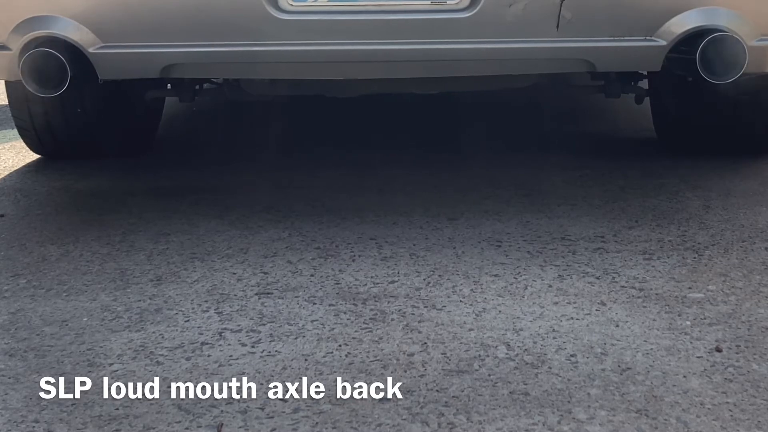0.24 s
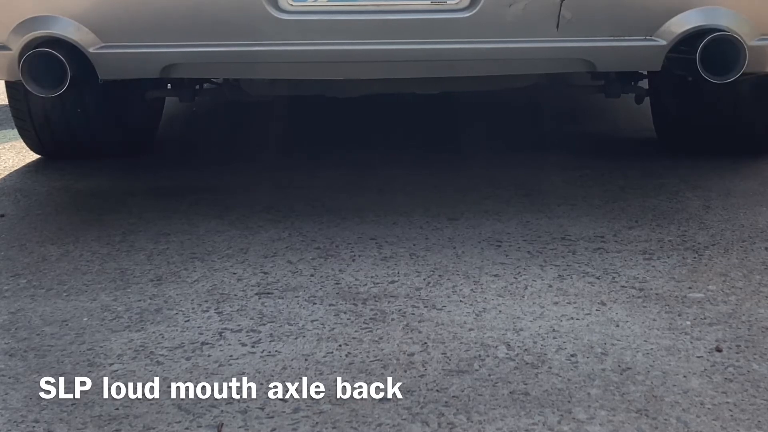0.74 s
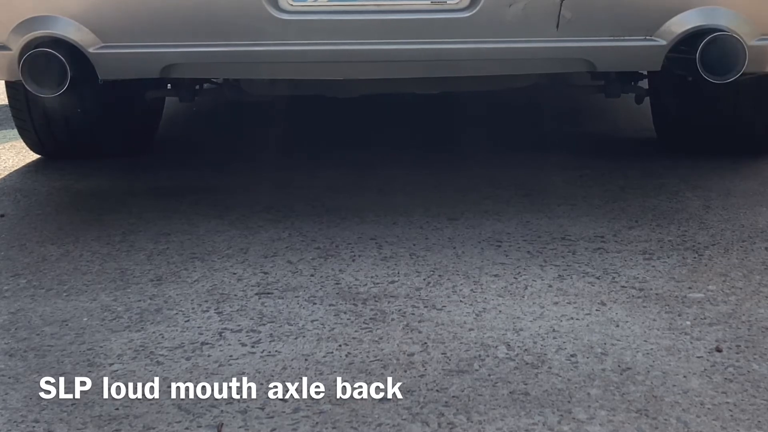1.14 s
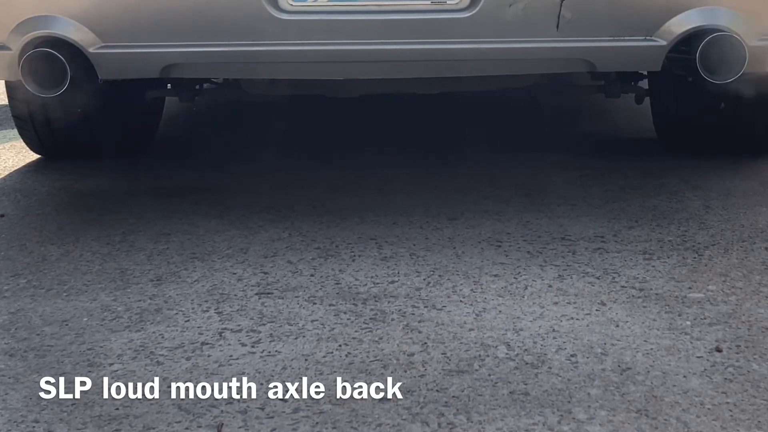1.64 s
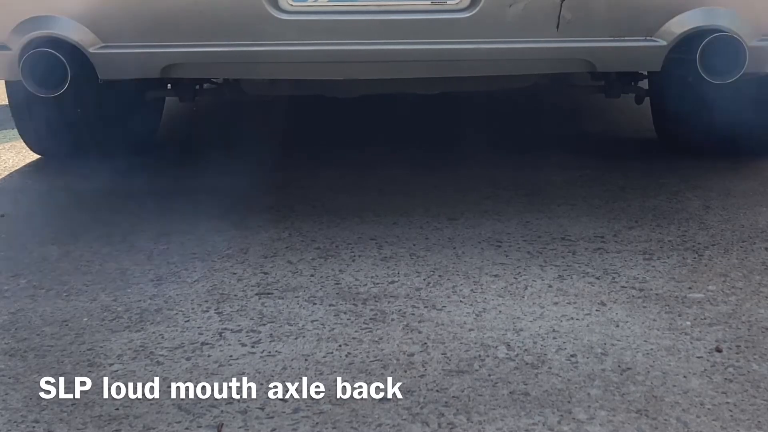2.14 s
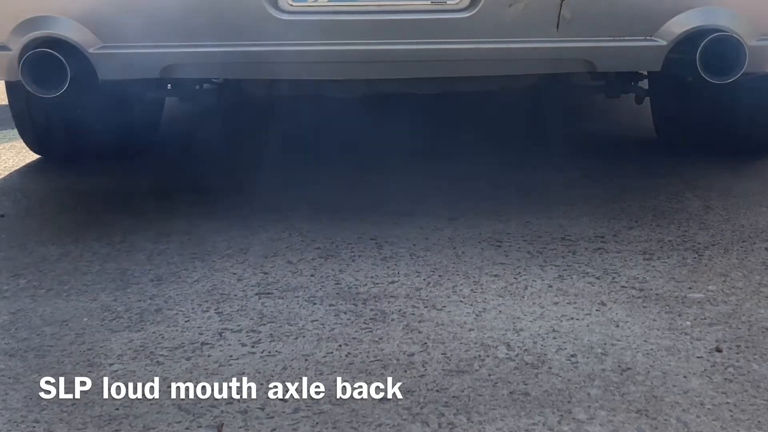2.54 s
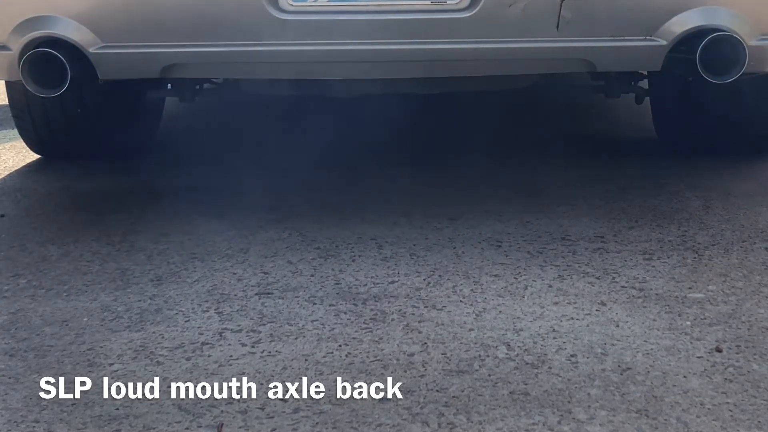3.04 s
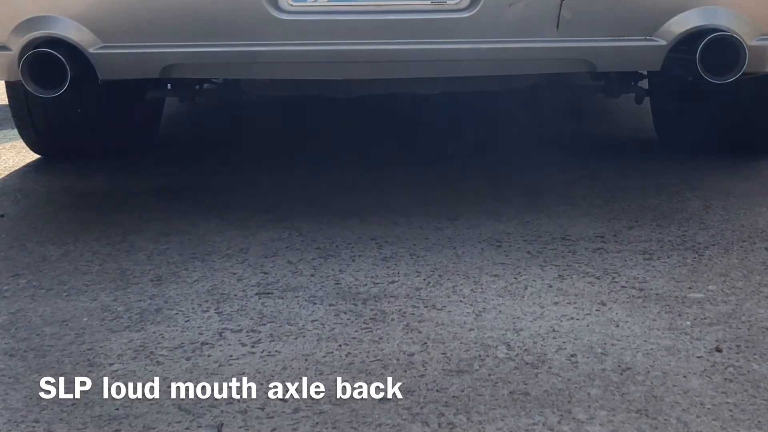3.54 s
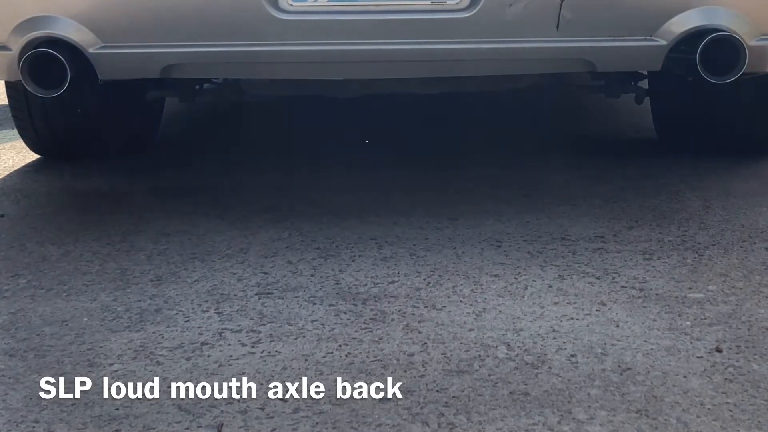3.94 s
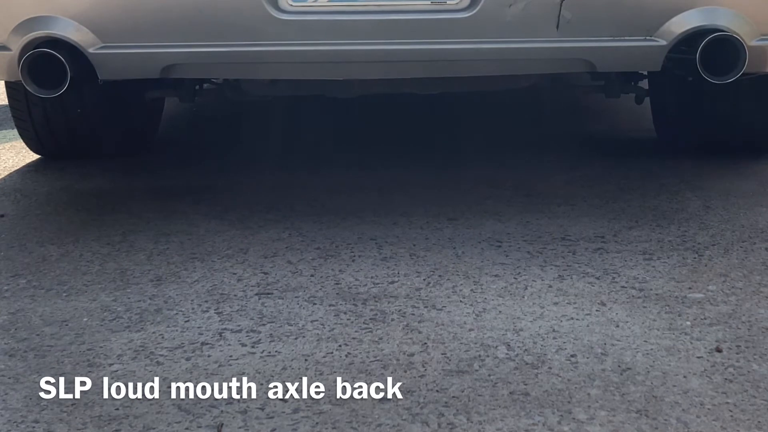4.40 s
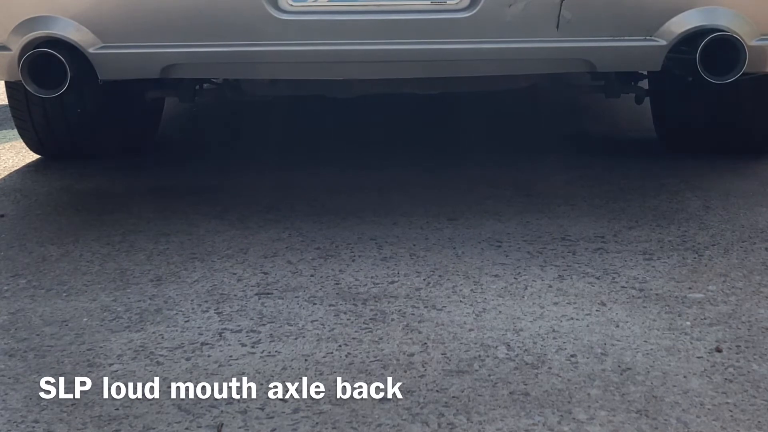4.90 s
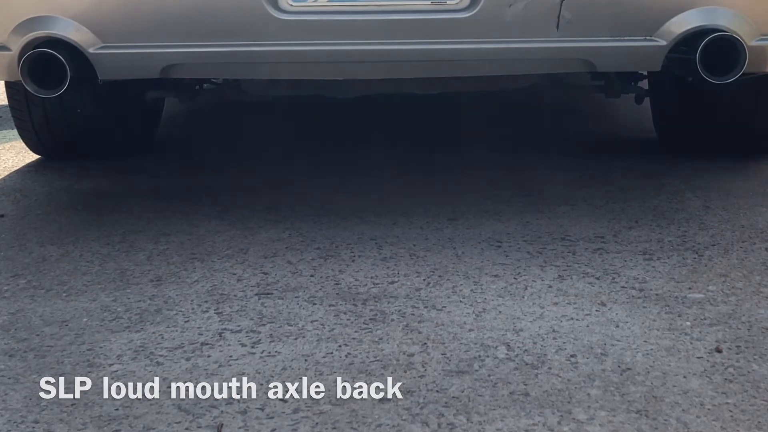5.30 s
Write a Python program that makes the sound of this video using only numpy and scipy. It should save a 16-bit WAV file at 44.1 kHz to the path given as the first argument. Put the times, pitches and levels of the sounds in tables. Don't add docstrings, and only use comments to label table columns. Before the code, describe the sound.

Outdoors, low and close behind a car's twin tailpipes, a throaty eight-cylinder engine is blipped at once, crackling and rasping, then falls with a swelling burble. A second, harder blip screams higher, its throttle snapping shut with a low thump and a volley of pops. The revs slide down to a steady fast idle drone. A close stereo microphone, loud and slightly saturated, with faint hiss and rumble beneath.

```python
import sys
import numpy as np
from scipy import signal
from scipy.fft import rfft, irfft, next_fast_len
from scipy.io import wavfile
from scipy.ndimage import uniform_filter1d

SR = 44100
rng = np.random.default_rng(int(sys.argv[2]) if len(sys.argv) > 2 else 0)


def invert_db(x):
    u = np.asarray(x, float) / 20
    return 10 ** u


def dump(signal):
    limited = np.clip(np.atleast_2d(signal).T, -1, 1)
    pcm = np.round(limited * 32767).astype(np.int16)
    wavfile.write(sys.argv[1], SR, pcm)


N = 245195

# time in seconds, firings per second.
FIRING_RATE = [(0.0, 84.6), (0.15, 115.6), (0.4, 210.9), (0.49, 233.5), (0.76, 212.9), (0.9, 191),
               (1.28, 141.9), (1.58, 116.9), (1.67, 148.8), (2.06, 311), (2.17, 337), (2.39, 323),
               (2.93, 244.1), (3.5, 169.4), (3.99, 128.7), (4.47, 102.1), (4.88, 90.3), (5.56, 88.0)]
# time in seconds, level in dB over a shut throttle.
GAS_LOAD = [(0.0, 13.5), (0.12, 22.5), (0.42, 21), (0.54, 15), (0.63, 10.5), (0.8, 4.8), (1.13, 1.5),
            (1.2, 8), (1.56, 4.5), (1.64, 18.5), (1.8, 20.5), (1.96, 18.5), (2.09, 15.5), (2.23, -0.5),
            (2.42, 7), (2.9, 3), (3.3, 1.5), (5.56, 3.5)]
# firing rate in Hz, rms in dB on a shut throttle.
DRONE_LEVEL = [(88, -20.5), (102, -16), (125, -20), (145, -15), (175, -19), (205, -20), (244, -20.5),
               (300, -22)]
# firing rate in Hz, rms in dB on a shut throttle.
OCTAVE_LEVEL = [(88, -30), (105, -38.5), (122, -29.5), (138, -29.5), (175, -25), (208, -30.5), (250, -26),
                (300, -35)]
CYLINDER_UNEVENNESS = [
    [.95, -.25, -.2, .3, .7, -.75, .35, .1],
    [1.3, -.25, -.05, -.1, .55, -.1, -.05, -.25],
]
# time in seconds, share from 0 to 1.
MISFIRE_SHARE = [(0, .25), (.45, .3), (.55, .2), (1.1, .3), (1.58, .3), (1.7, .3), (2.08, .35), (2.15, .1),
                 (2.4, .1), (2.7, .3), (3.05, .32), (3.2, .45), (3.45, .28), (4.4, .2), (4.75, .08),
                 (5.56, .08)]
# frequency in Hz, width in Hz, level in dB.
PIPE_MODES = [(221, 92, 1.5), (368, 47.6, 0.5), (427.5, 25, 3.5), (490.4, 47.2, 1), (534, 40.5, -3),
              (631.4, 51.7, -4.5), (767, 136, -13), (1102, 190, -22)]
# frequency in Hz, width in Hz, level in dB.
SILENCER_MODES = [(60.4, 14, -30), (151, 24, -2.5)]
CYLINDER_RASP_DB = [-7, 3, -19.5, 2, -10, -4, -2, -2]
# frequency in Hz, width in Hz, level in dB.
MOUTH_MODES = [(1437, 970, -3.5), (1550, 370, 2), (2310, 620, -3.5), (3140, 540, -6.5)]
# frequency in Hz, density in dB per Hz.
JET_SPECTRUM = [(1940, -22), (3300, -10.5), (3930, -3), (5770, -5.5), (6870, -16.5), (8240, -4.5),
                (9880, -10), (11400, -14.5), (13900, -16), (15600, 3.5)]
# frequency in Hz, density in dB per Hz.
FAN_SPECTRUM = [(5000, -30), (7500, -17), (10000, -1), (12500, 11), (15000, 8)]
# frequency in Hz, density in dB per Hz.
RUMBLE_SPECTRUM = [(15, -34), (35, -34), (60, -19), (130, -12), (300, -16), (650, -17), (1100, -40),
                   (3000, -48)]
# frequency in Hz, width in Hz, level in dB.
CASING_MODES = [(4520, 600, -56), (7200, 3000, -61)]
# time in seconds, crack peak in dB, level of the bright top relative to it in dB.
PIPE_POPS = [(0.0823, -10, -15), (0.1516, -3, -22.5), (0.2157, -14, -16), (0.3253, -10, -17),
             (0.368, -4.5, -17.5), (0.5059, -11, -24), (0.5396, -1.5, -34), (0.5744, -8, -33),
             (0.8499, 0, -53), (0.8653, -24, -31), (0.9331, -18, -38), (1.6886, -4.5, -24),
             (1.91, -0.5, -37), (1.9261, -3, -33), (1.9583, -16.5, 4), (1.9717, -6.5, -6.5),
             (1.987, -1.5, -16), (2.0154, 2, -22), (2.0292, -8, -4), (2.0413, -5.5, -7.5), (2.056, -24, 4),
             (2.069, -9, -18), (2.0974, -9, -22), (2.1415, -11.5, -23), (2.188, -18, -28),
             (2.466, -9.5, -35), (2.4795, -15.5, -31), (2.4142, -16.5, -31), (2.5061, -12, -24),
             (2.6262, -24.5, -20)]
# start in seconds, length in seconds, burble gain in dB.
LATE_BURNS = [
    (.803, 0.16, 10),
    (1.002, .095, 8.5),
    (2.394, 0.16, 7.5),
    (2.608, 0.039, 2),
]
# start in seconds, peak in dB, pitch in Hz, 60 dB decay in seconds.
GAS_THUMPS = [
    (2.053, -9.5, 51, .17),
]
# frequency in Hz, left's lead in
PORT_LEAD = [(0, 0), (700, -.1), (1500, -.5), (3300, -2.0), (5700, -2.2), (6500, -5.4), (8000, -7.2),
             (8600, -9.3), (9550, -9.55), (10100, -11.6), (12600, -13.8), (13150, -15.55), (14300, -15.85),
             (14800, -18.5)]
# frequency in Hz, left minus right in dB.
PORT_TILT = [(60, -.3), (200, 0), (500, 0), (1000, .8), (2200, 4), (4400, .5), (8500, 0), (15000, 0)]
# frequency in Hz, level in dB.
PORT_APART = [(30, -18), (120, -28), (300, -26), (700, -11), (1500, -7), (3000, -7), (6800, -9),
              (8500, -30), (15000, -28)]

# (dB on a shut throttle, dB per dB of load)
RASP, JET, BURBLE = (-45, 0.95), (-52.5, 1.324), (-27, 0.71)
DRONE_FOLLOWS, OCTAVE_FOLLOWS = 0.44, 0.4
BURBLE_DB_PER_OCTAVE, BOOM_DB, AFTERBURN_BOOM_DB = 5, 5.8, 11.5
PIPE_CUT_HZ = 1005
RUMBLE_DB = -37
FUEL_CUT_S, FUEL_CUT_DB = (2.13, 2.6), (-6, -3, -3.5)
LIFT_OFF_S, LIFT_OFF_DB = (2.045, 2.16), (-3, -4.5)
AFTERBURN_SAG, AFTERBURN_SHARE, AFTERBURN_DRONE = 0.3, 0.72, -0.57
CRACKLES_PER_S, CRACKLE_DB = (16, 80), (7.5, 13)
CRACKLE_SPREAD_DB, CRACKLE_TOP_DB = 5, -18


def rms_one(x):
    return x / np.sqrt(np.mean(x ** 2) + 1e-20)


def evened(x, window_s):
    return x / np.sqrt(uniform_filter1d(x ** 2, size=int(window_s * SR)) + 1e-12)


def at_hz(points, hz):
    at, value = np.transpose(points)
    return np.interp(np.log(hz + 1), np.log(at + 1), value)


def in_time(rows):
    return np.interp(np.arange(N) / SR, *np.transpose(rows))


def between(start_s, end_s, edge_s=0.0054):
    t = np.arange(N) / SR
    return np.clip(np.minimum(t - start_s, end_s - t) / edge_s, 0, 1)


def shaped(x, gain):
    size = next_fast_len(N + 4096)
    hz = np.arange(size // 2 + 1) * SR / size
    return irfft(rfft(x, size) * gain(hz), size)[..., :N]


def noise(white, spectrum):
    return rms_one(shaped(white, lambda hz: invert_db(at_hz(spectrum, hz))))


def resonate(x, modes):
    out = 0
    for k, (hz, width_hz, db) in enumerate(modes):
        r = np.exp(-np.pi * width_hz / SR)
        poles = [1, -2 * r * np.cos(2 * np.pi * hz / SR), r * r]
        mode = signal.lfilter([1 - r * r, 0, r * r - 1], poles, x + 1e-18)
        out = out + (-1) ** k * invert_db(db) * mode
    return out


def travelled(slugs):
    return shaped(slugs, lambda hz: np.exp(-5.5j * np.log(1 + hz / 150)))


def train(at, sizes):
    clicks = np.zeros(N)
    clicks[at] = sizes
    return clicks


def puffs(clicks, decay_s):
    envelope = signal.lfilter([1], [1, -np.exp(-1 / (decay_s * SR))], clicks)
    return envelope * rng.standard_normal(N)


def drone(turns, drone_db, octave_db, wobble):
    angle = 2 * np.pi * turns
    tone = invert_db(drone_db) * (np.cos(angle - .4) + invert_db(-23.5) * np.cos(3 * angle + 2.8))
    return np.sqrt(2) * wobble * (tone + invert_db(octave_db) * np.cos(2 * angle + 1.57))


def burble(at, firing_hz, late, luck, gas):
    rate = firing_hz[at]
    share = np.maximum(in_time(MISFIRE_SHARE)[at], AFTERBURN_SHARE * late[at])
    fast = np.clip((rate - 150) / 150, 0, 1)
    idle, speed = [np.resize(row, len(at)) for row in CYLINDER_UNEVENNESS]
    regular = (1 - share) * ((1 - fast) * idle + fast * speed)
    chance = share * .5 * luck[:len(at)]
    churn = np.interp(np.arange(N), at, share * np.sqrt(rate / SR)) * .12 * gas
    pipes = resonate(travelled(train(at, regular + chance)) + churn, PIPE_MODES)
    pipes = evened(pipes, window_s=.12)
    pipes = signal.sosfilt(signal.butter(2, PIPE_CUT_HZ, fs=SR, output="sos"), pipes)
    long_slug = invert_db(BOOM_DB + AFTERBURN_BOOM_DB * late[at] - 10.0 * np.log2(rate / 90))
    slugs = train(at, long_slug * (regular + 0.36 * chance))
    chamber = resonate(travelled(slugs), SILENCER_MODES)
    return pipes + chamber * invert_db(73.5) / np.sqrt(firing_hz)


def rasp(at, luck):
    sizes = invert_db(np.resize(CYLINDER_RASP_DB, len(at)) + 4.1 * luck[:len(at)])
    return puffs(train(at, sizes), decay_s=0.0044) + 0.26 * rng.standard_normal(N)


def jet_hiss(gas, hiss_db):
    return invert_db(hiss_db + 3.5) * noise(0.14 * gas + rng.standard_normal(N), JET_SPECTRUM)


def fan_hiss(firing_hz):
    return invert_db(-51) * firing_hz / 150 * noise(rng.standard_normal(N), FAN_SPECTRUM)


def exhaust_rumble(burble_db, cut):
    level_db = RUMBLE_DB + FUEL_CUT_DB[2] * cut + 0.87 * (burble_db + 30.5)
    return invert_db(level_db) * noise(rng.standard_normal(N), RUMBLE_SPECTRUM)


def whirr(turns, firing_hz):
    out = np.zeros(N)
    for order in range(13, 38):
        gain = 0
        for hz, width_hz, db in CASING_MODES:
            gain = gain + invert_db(db) / (1 + (2 * (order * firing_hz - hz) / width_hz) ** 4)
        out += gain * invert_db(rng.normal(0, 3)) * np.sin(2 * np.pi * (order * turns + rng.random()))
    return out * np.clip(firing_hz / 250, 0, 1) ** 2


def crackles(at, firing_hz, load_db, rasp_db):
    luck = rng.random((1500, 3))[:len(at)]
    per_s = np.interp(load_db[at], [4, 16], CRACKLES_PER_S)
    prone = np.resize(invert_db(np.array(CYLINDER_RASP_DB)), len(at))
    fired = luck[:, 0] < per_s / firing_hz[at] * prone / prone.mean()
    peak_db = rasp_db[at] + np.interp(load_db[at], [4, 16], CRACKLE_DB)
    peak_db = peak_db + 2 * CRACKLE_SPREAD_DB * (2 * luck[:, 1] - 1)
    top_db = CRACKLE_TOP_DB + 5.7 * (luck[:, 2] - .5)
    return np.transpose([at / SR, peak_db, top_db])[fired]


def pops(small):
    s, peak_db, top_db = np.transpose(np.concatenate([small, PIPE_POPS]))
    at = np.round(s * SR).astype(int)
    blows = train(at, invert_db(peak_db))
    blast = 2.93 * blows + 1.24 * puffs(blows, decay_s=0.00036)
    crack = resonate(blast, [(1850, 3000, 1.5), (2950, 1580, 4.0)])
    top = puffs(train(at, invert_db(peak_db + top_db + 7.5)), decay_s=0.0012)
    top = signal.sosfilt(signal.butter(1, [3200, 13500], "band", fs=SR, output="sos"), top)
    return crack + top + invert_db(-3) * resonate(travelled(blows), PIPE_MODES)


def afterburn():
    t = np.arange(N) / SR
    gain_db, late = np.zeros(N), np.zeros(N)
    for s, length, db in LATE_BURNS:
        burning = between(s, s + length)
        gain_db += db * burning * (1 - AFTERBURN_SAG * (t - s) / length)
        late += burning
    return gain_db, late


def thumps():
    out = np.zeros(N)
    for s, peak_db, hz, t60 in GAS_THUMPS:
        t = np.clip(np.arange(N) / SR - s, 0, None)
        swell = (1 - np.exp(-t / .006)) * invert_db(-60 * t / t60)
        cycles = hz * (t + .022 * (1 - np.exp(-t / .009)))
        out += invert_db(peak_db + 4) * swell * np.sin(2 * np.pi * cycles)
    return out


def ports(x):
    sides = np.array([[.5], [-.5]])
    direct = shaped(x, lambda hz: invert_db(sides * at_hz(PORT_TILT, hz)) * np.exp(1j * sides * at_hz(PORT_LEAD, hz)))
    scatter = rng.standard_normal((2, 1300)) * np.exp(-np.arange(1300) / (0.0045 * SR))
    scatter = scatter / np.linalg.norm(scatter, axis=1, keepdims=True)
    echoes = signal.fftconvolve(x[None], scatter)[:, :N]
    return direct + shaped(echoes, lambda hz: invert_db(at_hz(PORT_APART, hz)))


def scene():
    firing_hz, load_db = in_time(FIRING_RATE), in_time(GAS_LOAD)
    late_db, late = afterburn()
    cut, lift_off = between(*FUEL_CUT_S), between(*LIFT_OFF_S)
    open_db = np.maximum(load_db, 0)

    drone_db = at_hz(DRONE_LEVEL, firing_hz) + DRONE_FOLLOWS * open_db + AFTERBURN_DRONE * late_db
    drone_db = drone_db + FUEL_CUT_DB[0] * cut + LIFT_OFF_DB[0] * lift_off
    octave_db = at_hz(OCTAVE_LEVEL, firing_hz) + OCTAVE_FOLLOWS * open_db
    rasp_db, hiss_db, burble_db = [db + follows * load_db for db, follows in (RASP, JET, BURBLE)]
    burble_db = burble_db + BURBLE_DB_PER_OCTAVE * np.log2(firing_hz / 90) + late_db
    burble_db = burble_db + FUEL_CUT_DB[1] * cut + LIFT_OFF_DB[1] * lift_off

    turns = np.cumsum(firing_hz) / SR
    at = np.flatnonzero(np.diff(np.floor(turns)))
    burble_luck, rasp_luck, wobble_luck, far_luck = rng.standard_normal((4, 1500))
    wobble = np.interp(np.arange(N), at, invert_db(.9 * wobble_luck[:len(at)]))

    gas = evened(rasp(at, rasp_luck), window_s=0.125)
    heard = drone(turns, drone_db, octave_db, wobble)
    heard = heard + invert_db(burble_db - 5.5) * burble(at, firing_hz, late, burble_luck, gas)
    heard = heard + invert_db(rasp_db - 1.5) * rms_one(resonate(gas, MOUTH_MODES))
    heard = heard + jet_hiss(gas, hiss_db) + fan_hiss(firing_hz) + exhaust_rumble(burble_db, cut)
    heard = heard + whirr(turns, firing_hz)
    heard = heard + pops(crackles(at, firing_hz, load_db, rasp_db)) + thumps()

    far_mouth = evened(resonate(rasp(at[4:], far_luck), MOUTH_MODES), window_s=0.17)
    far_mouth = invert_db(rasp_db - 4.5) * far_mouth
    return ports(heard) + np.stack([0.98 * far_mouth, np.roll(far_mouth, 9)])


def low_pass(x):
    return signal.sosfilt(signal.butter(12, 15720, fs=SR, output="sos"), x)


def record(dry):
    rounded = 0.95 * np.tanh(dry / 0.9)
    mix = signal.sosfilt(signal.cheby2(10, 60, 15900, fs=SR, output="sos"), rounded)
    return low_pass(mix)


dry = scene()
out = record(dry)
dump(out)
```